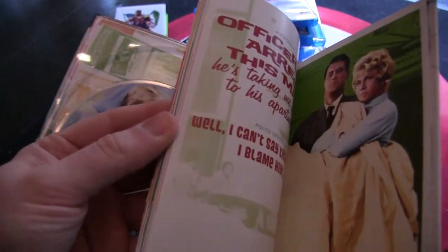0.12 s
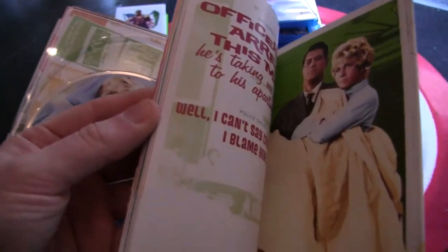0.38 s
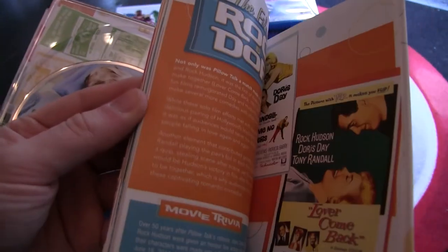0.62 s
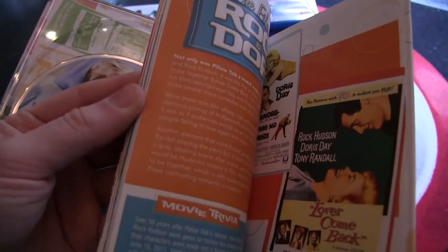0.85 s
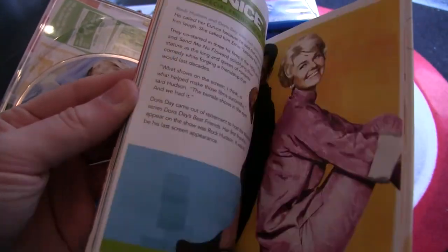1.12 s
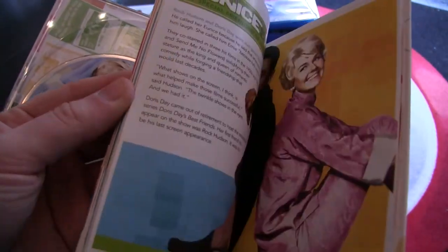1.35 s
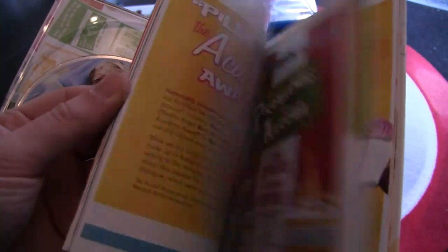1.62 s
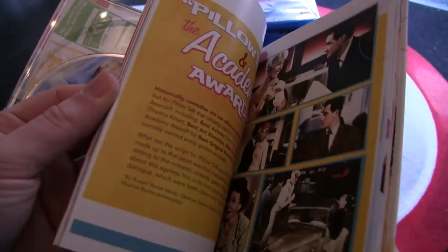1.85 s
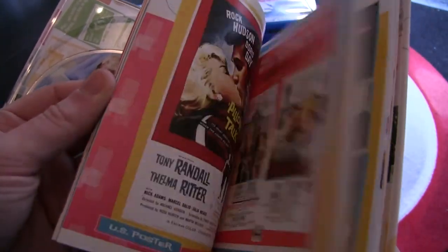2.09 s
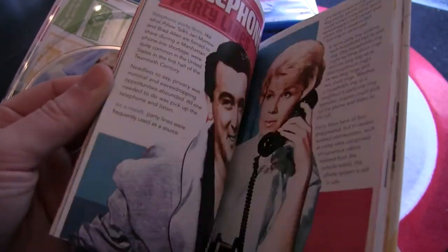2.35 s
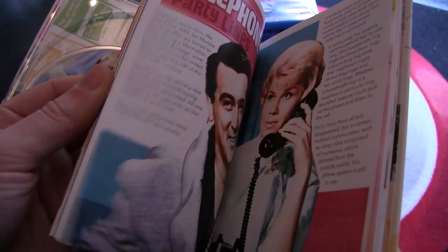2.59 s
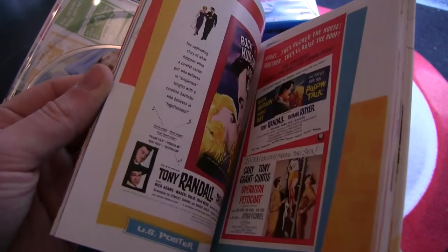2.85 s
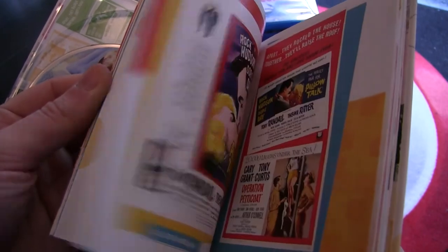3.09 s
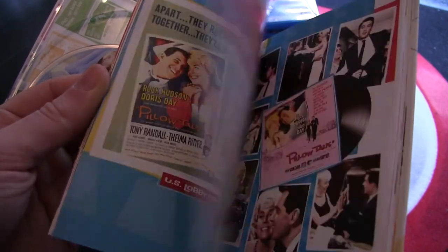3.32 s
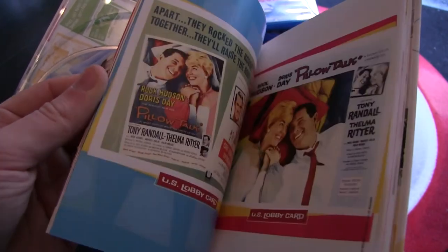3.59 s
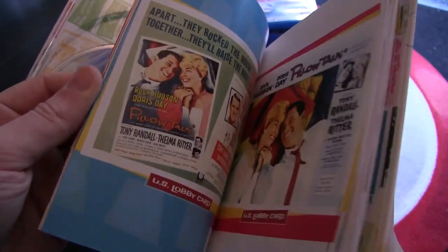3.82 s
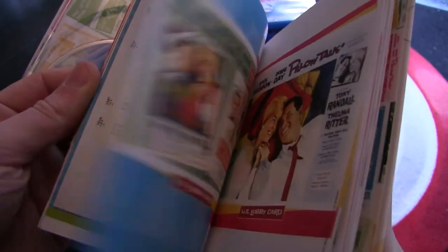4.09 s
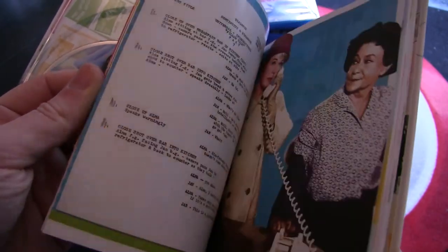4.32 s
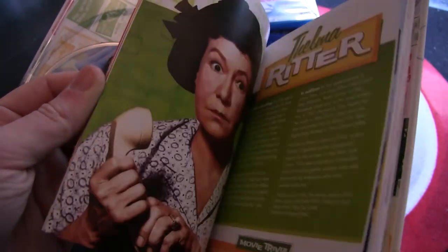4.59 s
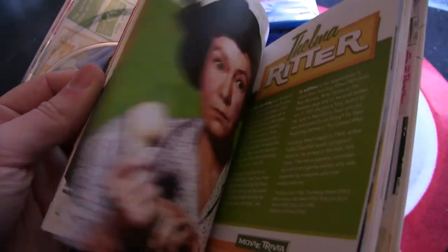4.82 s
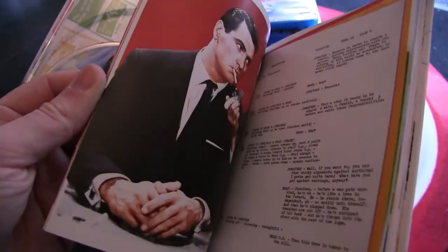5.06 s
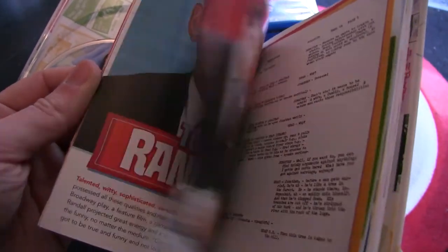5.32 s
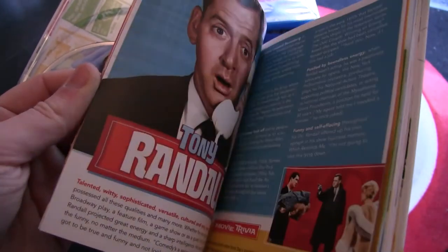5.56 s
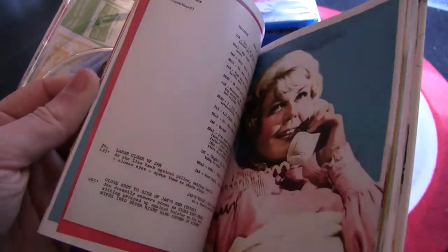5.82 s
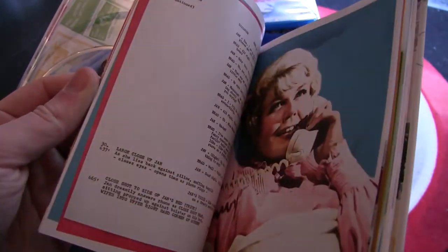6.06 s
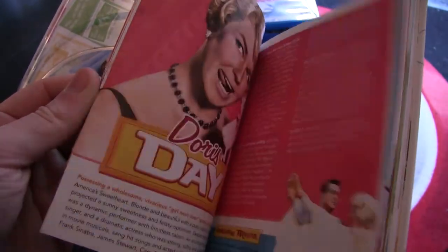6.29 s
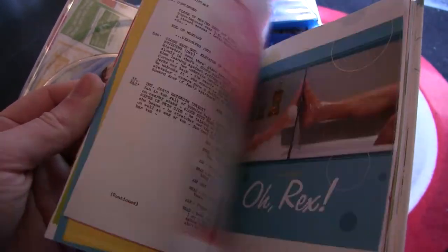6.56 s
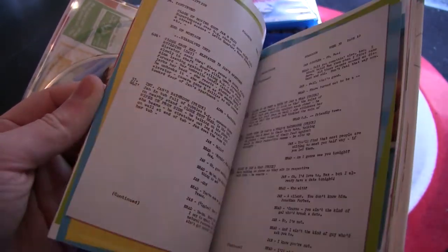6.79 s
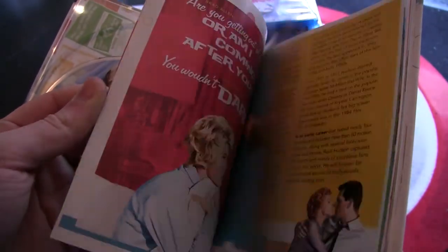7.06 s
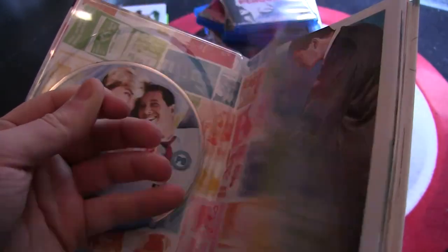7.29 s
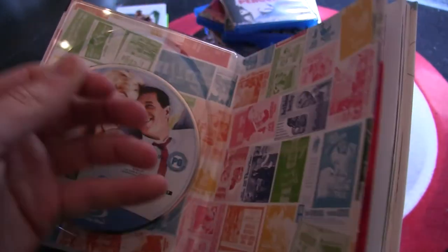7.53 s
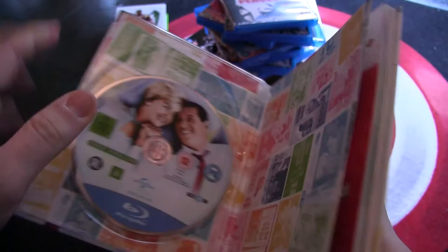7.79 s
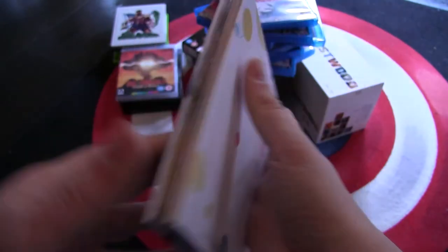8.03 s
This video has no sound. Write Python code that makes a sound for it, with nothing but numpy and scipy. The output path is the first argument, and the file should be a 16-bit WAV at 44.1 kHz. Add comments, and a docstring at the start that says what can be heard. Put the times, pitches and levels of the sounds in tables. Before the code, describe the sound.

Glossy booklet pages flick past one by one in a quiet room, then a stiff cover snaps loudly and a hand slides over it.

```python
"""Glossy pages slip one by one from under a thumb in a quiet room: each release is a clump of tiny slips, heard as
a short snap and a knock of the stack through resonances, with a sinking puff of air. Swinging paper rustles as
swelling grain noise. The stiff cover creaks and later snaps loudly through its modes, then a hand slides over it as
friction noise and the book is pressed shut with a deep puff. A short echo and a diffuse tail answer from the room;
a close stereo microphone adds its own steady, coloured hiss."""
import sys
import numpy as np
from scipy import signal
from scipy.fft import rfft, irfft, next_fast_len
from scipy.io import wavfile

SR = 44100
rng = np.random.default_rng(int(sys.argv[2]) if len(sys.argv) > 2 else 0)


def boost(x):
    """Linear amplitude factor 10**(x/20) for a level x in decibels (scalar or array-like)."""
    u = np.asarray(x, float) / 20
    return 10 ** u


def pcm_store(signal):
    """Save signal as 16-bit PCM."""
    levels = np.round(np.clip(np.atleast_2d(signal), -1, 1) * 32767)
    wavfile.write(sys.argv[1], SR, levels.astype(np.int16).T)


N = 359679
BURST_SIZE = SR // 20   # samples in 50 ms


def rms_one(x):
    """Normalisation by mean power: scale to rms 1."""
    return x / np.sqrt(np.mean(x ** 2) + 1e-20)


def in_time(rows):
    """Linear interpolation: the columns of a time curve at every sample."""
    s, *columns = np.transpose(rows)
    return [np.interp(np.arange(N) / SR, s, column) for column in columns]


def at_hz(points, hz):
    """Spectral interpolation: read levels on a log-frequency axis."""
    point_hz, point_db = np.transpose(points)
    return np.interp(np.log(hz + 1), np.log(point_hz), point_db)


def band(x, low_hz, high_hz):
    """Band limitation by a Butterworth band-pass."""
    return signal.sosfilt(signal.butter(2, [low_hz, high_hz], "band", fs=SR, output="sos"), x)


def resonance(x, hz, width_hz):
    """Damped oscillator: a two-pole resonance with gain 1 on top."""
    r = np.exp(-np.pi * width_hz / SR)
    zeros = [(1 - r * r) / 2, 0, (r * r - 1) / 2]
    poles = [1, -2 * r * np.cos(2 * np.pi * hz / SR), r * r]
    return signal.lfilter(zeros, poles, x)


def grains(size, per_s, uneven_db):
    """Shot noise: random clicks of uneven size and sign."""
    draw = rng.random((3, size))
    present = draw[0] < per_s / SR
    height = boost(-uneven_db * np.log(draw[1] + 0.04))
    return present * height * np.sign(draw[2] - .5) + 1e-9


def burst(rise_ms, fall_ms, lag_ms=0.):
    """Transient envelope of 50 ms: exponential growth to a top at 10 ms plus the lag, then exponential decay."""
    ms = np.arange(BURST_SIZE) * 1000 / SR - 10 - lag_ms
    fade_in = np.clip((ms + 10) / 4.0, 0, 1)
    return np.exp(np.where(ms < 0, ms / rise_ms, -ms / fall_ms)) * fade_in


def add(out, sound, s, db):
    """Superposition: lay in a burst with its 10 ms mark at s, its energy equal to that of 10 ms at db."""
    at = round((s - .01) * SR)
    sound = sound * boost(db) * np.sqrt(SR / 100 / np.sum(sound ** 2))
    out[at:at + len(sound)] += sound[:N - at]


def hiss():
    """Stationary noise of room air and microphone: spectrally shaped, the side part coloured on its own."""
    # mid spectrum shape: (frequency [Hz], relative density [dB per Hz])
    spectrum = [(18, -46), (30, -19.5), (86, -3.5), (233, -1), (404, -2.5), (569, 0.5), (632, -2.5),
                (866, -4), (1540, -6.5), (1670, -5), (8520, -15), (14400, -22), (16000, -34)]
    # stereo width of the noise: (frequency [Hz], side minus mid [dB])
    side_balance = [(60, -5), (110, -5), (200, 2), (380, 3.5), (700, 2.5), (1290, -1), (2380, -5.5),
                    (4400, -6.5), (8120, -7), (15000, -3)]
    mid_db = -60.5   # rms
    size = next_fast_len(N)
    hz = np.arange(size // 2 + 1) * SR / size
    mid, side = irfft(rfft(rng.standard_normal((2, size))) * boost(at_hz(spectrum, hz)), size)
    side = irfft(rfft(side) * boost(at_hz(side_balance, hz)), size)
    left_right = (mid + side * [[1], [-1]])[:, :N]
    return boost(mid_db) / np.std(mid) * left_right


def cover_clicks():
    """Modal excitation: the cover's resonances swell and die together, roughened by slips, around a broad crack.
    Returns what reaches the microphone and what spreads to the walls, where the crack outweighs the ring."""
    # creaks and snap of the cover: (time [s], rms level over 10 ms [dB], build-up [ms], dying [ms],
    # brightness [dB per octave], roughness [0-1])
    clicks = [(0.267, -39, 1.8, 3.6, 3.5, 0.98), (7.3040, -34, 7, 7.7, -3, 1),
              (7.312, -18.5, 1.2, 2.2, 3.5, 0)]
    # modes of the cover: (frequency [Hz], width [Hz], relative level per Hz of width, before brightness [dB])
    cover_modes = [(467, 600, -11), (928, 65, 2), (1206, 620, -0.5), (1900, 94, -6.5), (2200, 540, -2),
                   (2520, 86, -4.5), (3110, 380, -11.5), (3700, 630, -33), (4570, 240, -18),
                   (6800, 590, -33), (10450, 2000, -41)]
    crack_to_ring_db = -8.5   # at the microphone
    ring_to_room_db, crack_to_room_db = -4, -2.5   # relative to the click's level
    near, far = np.zeros(N), np.zeros(N)
    time = np.arange(BURST_SIZE) / SR
    for s, db, rise_ms, fall_ms, bright_db, rough in clicks:
        shape, ring = burst(rise_ms, fall_ms), 0
        for hz, width_hz, mode_db in cover_modes:
            swing = np.sin(2 * np.pi * (hz * time + rng.random()))
            slips = resonance(grains(BURST_SIZE, per_s=10000, uneven_db=0.0), hz, 1300)
            push = (1 - rough) * swing + rough * slips
            mode = resonance(push * shape, hz, width_hz)
            tilted_db = mode_db + bright_db * np.log2(hz / 1500)
            ring = ring + rms_one(mode) * np.sqrt(width_hz) * boost(tilted_db)
        crack = resonance(rng.standard_normal(BURST_SIZE) * shape, hz=2900, width_hz=1640)
        crack = band(crack, 290, 11700)
        add(near, rms_one(ring) + boost(crack_to_ring_db) * rms_one(crack), s, db)
        add(far, ring, s, db + ring_to_room_db)
        add(far, crack, s, db + crack_to_room_db)
    return near, far


def room(x):
    """Reverberation by convolution: a smeared, thin echo from a near surface and a diffuse, partly shared tail."""
    t60_s, echo_ms = .34, 11.6
    tail_db, echo_db = -11.5, -25   # energy of the response, before the final band-pass
    s = np.arange(round(t60_s * SR)) / SR
    noise = rng.standard_normal((3, len(s)))
    noise = noise[:2] + 1.07 * noise[2]   # one noise per channel plus one common to both
    tail = noise * boost(-60 * s / t60_s) * np.clip(s / 0.0018, 0, 1)
    echo = noise * np.exp(-((1000 * s - echo_ms) / 0.84) ** 2)
    answer = boost(tail_db) * rms_one(tail) + boost(echo_db) * rms_one(band(echo, 1600, 15000))
    answer = band(answer, 66, 16000) / np.sqrt(len(s))
    return signal.fftconvolve(answer, x[None], axes=1)[:, :N]


def rustle():
    """Granular friction of moving paper: low pats and a fine bright swish swell and fade with each swing."""
    # a page swings over and brushes its neighbour: (middle [s], half length to 1/e [s],
    # top level of low rustle [dB], top level of high rustle [dB])
    page_swings = [(0.302, 0.027, -65, -60.5), (0.603, 0.11, -70, -74), (1.127, 0.21, -62.5, -67.5),
                   (1.408, 0.037, -70, -60), (1.592, 0.1, -67, -59.5), (2.254, 0.09, -67, -75),
                   (3.31, 0.057, -69, -70), (4.1, .1, -68, -72), (6.2, .08, -71, -84),
                   (6.564, 0.083, -67, -67.5), (6.902, 0.052, -65, -67), (7.024, 0.03, -65, -60),
                   (7.264, 0.028, -57, -56), (7.35, 0.044, -55, -59), (7.423, 0.07, -76, -59.5),
                   (8.048, 0.0066, -41, -54)]
    pats = rms_one(band(grains(N, per_s=700, uneven_db=4.5), 79, 820))
    swish = rms_one(band(grains(N, per_s=4500, uneven_db=6.5), 820, 6800))
    out = np.zeros(N)
    for s, half_s, low_db, high_db in page_swings:
        swell = np.exp(-((np.arange(N) / SR - s) / half_s) ** 2)
        out += swell * (boost(low_db) * pats + boost(high_db) * swish)
    return out


def air_puff(first_hz, last_hz, rise_ms, fall_ms, lag_ms=0.):
    """Volume flow of air squeezed from between two sheets: a soft cycle or two that sinks in pitch."""
    ms = np.arange(BURST_SIZE) * 1000 / SR - 10 - lag_ms
    hz = last_hz + (first_hz - last_hz) * np.exp(-np.maximum(ms + rise_ms, 0) / (0.34 * fall_ms))
    shape = np.exp(-np.where(ms < 0, ms / rise_ms, ms / fall_ms) ** 2)
    return band(shape * np.sin(2 * np.pi * np.cumsum(hz) / SR), 33, 1200)


def let_go(puff_db, knock_db, snap_db, snap_hz, tick_db, rise_ms, fall_ms):
    """Stick-slip release of a page edge: a clump of tiny slips, treble first, then the stack's knock, the air last."""
    out, s = np.zeros(BURST_SIZE), .01
    slips = grains(BURST_SIZE, per_s=14000, uneven_db=2.5)
    puff_detune, knock_detune = np.exp(rng.normal(0, 1, 2) * [.2, .08])   # every page bends a little differently
    clump = slips * burst(rise_ms, fall_ms)
    tick = resonance(clump, hz=7840, width_hz=2460)
    add(out, band(tick, 6600, 16200), s, tick_db)
    snap = resonance(clump, snap_hz, 0.58 * snap_hz) + .2 * clump
    add(out, band(snap, 1650, 7500), s, snap_db)
    push = slips * burst(0.76 * rise_ms, 0.98 * fall_ms, lag_ms=0.17)
    knock = resonance(push, 1030 * knock_detune, width_hz=340) + 0.06 * push
    add(out, band(knock, 450, 1800), s, knock_db)
    hz = 261 * puff_detune
    puff = air_puff(1.683 * hz, 0.87 * hz, rise_ms=0.74 * 3.46, fall_ms=3.46, lag_ms=1.97)
    add(out, puff, s, puff_db)
    return out


def flicks():
    """Impulsive release: sharp flicks push air in step with their knock; soft pats build up slowly, short of treble."""
    # page flicks, levels as rms over 10 ms: (time [s], stack knock [dB], paper snap [dB], snap pitch [Hz],
    # edge tick [dB])
    page_flicks = [(0.513, -45.5, -40, 7000, -46), (0.5793, -54, -60, 3800, -64),
                   (0.7106, -54, -54, 4100, -66), (0.9986, -57, -61, 4500, -68),
                   (1.0027, -46, -42.5, 4960, -45.5), (1.0678, -54, -47.5, 4800, -71),
                   (1.0693, -48, -72, 7200, -52), (1.139, -61, -58.5, 3570, -71),
                   (1.148, -61, -58, 3600, -79), (1.2603, -60.5, -59, 2320, -69),
                   (1.3873, -49, -48, 1900, -63), (1.5789, -50.5, -44, 3300, -48),
                   (1.6305, -52, -48.5, 5160, -53), (2.0395, -49.5, -40.5, 4000, -47),
                   (2.2179, -53.5, -60, 3400, -55), (2.2245, -49, -40.5, 4140, -49.5),
                   (2.633, -50, -41.5, 3700, -49), (3.1348, -48.5, -50, 5000, -54),
                   (3.3338, -48.5, -43.5, 6330, -49.5), (3.623, -56.5, -59.5, 2480, -75),
                   (3.845, -43.5, -49.5, 2080, -72), (4.1109, -53.5, -52.5, 3180, -60),
                   (4.399, -51.5, -51, 4800, -58), (4.5713, -64, -54.5, 2900, -53.5),
                   (4.656, -74, -63, 3080, -61.5), (4.8465, -52, -49, 3300, -59),
                   (5.311, -59, -64, 4000, -73), (5.3189, -54, -48.5, 3960, -58.5),
                   (5.646, -59, -61, 3400, -75), (5.6589, -51.5, -49.5, 4940, -64),
                   (5.903, -65, -61.5, 2700, -77), (6.1742, -58, -61, 4200, -73),
                   (6.183, -49.5, -54, 6100, -57), (6.371, -63, -59, 6850, -69),
                   (6.3848, -47, -48.5, 6500, -56), (6.5167, -62, -50.5, 3800, -52.5),
                   (6.5224, -73, -56, 3000, -56), (6.5569, -48.5, -47, 1890, -56),
                   (6.7546, -48.5, -64, 2000, -79), (6.898, -47, -45.5, 5330, -53),
                   (6.9426, -51, -59, 2000, -75), (7.0188, -54, -55, 5800, -65),
                   (7.0253, -47, -46.5, 5700, -63), (7.0774, -59.5, -45.5, 3400, -58),
                   (7.2586, -55, -48, 6100, -64), (7.2627, -49.5, -45.5, 2370, -54)]
    # dull pats of pages and fingers on the stack, levels as rms over 10 ms: (time [s], air puff [dB],
    # stack knock [dB], paper snap [dB])
    soft_pats = [(0.4105, -79, -57, -63.5), (0.634, -54.5, -60, -71), (1.1205, -54, -64, -74),
                 (1.5224, -61, -61, -72), (1.707, -57, -75, -73), (1.9126, -59, -69, -74),
                 (3.2789, -60, -53.5, -75), (6.336, -62, -63, -74), (6.3673, -61, -54.5, -68),
                 (6.702, -58.5, -56, -75), (6.8757, -70, -57, -63), (6.8883, -73, -53.5, -67),
                 (7.1283, -61, -55, -76), (7.148, -57.5, -67, -76), (7.727, -69, -56, -57),
                 (7.8032, -61, -54, -56.5), (7.863, -53.5, -48.5, -66), (7.9771, -50, -50, -63),
                 (7.9981, -64, -42.5, -50), (8.021, -68, -52, -50), (8.035, -66, -54, -62)]
    out = np.zeros(N)

    def place(s, *release):
        at = round((s - .01) * SR)
        out[at:at + BURST_SIZE] += let_go(*release)

    for s, knock_db, snap_db, hz, tick_db in page_flicks:
        # a thicker bunch knocks more than it snaps and lets go more slowly
        cling = np.exp(.06 * np.clip(knock_db - snap_db, -16, 3))
        place(s, knock_db - 5.5, knock_db, snap_db, hz, tick_db, 1.35 * cling, 2 * cling)   # last two in ms
    for s, puff_db, knock_db, snap_db in soft_pats:
        place(s, puff_db, knock_db, snap_db, 4000, snap_db - 16, 2, 3.4)   # snap Hz, tick dB, rise and fall ms
    return out


def thumps():
    """Volume displacement: stiff covers move more air than a page, in longer, deeper puffs."""
    # cover falling to and book shutting: (time [s], rms level over 10 ms [dB], first pitch [Hz], last pitch [Hz],
    # build-up [ms], dying [ms])
    cover_puffs = [(7.3163, -41, 334, 95, 1.5, 9.9), (8.0477, -38.5, 388, 107, 3.7, 9.8)]
    out = np.zeros(N)
    for s, db, first_hz, last_hz, rise_ms, fall_ms in cover_puffs:
        add(out, air_puff(first_hz, last_hz, rise_ms, fall_ms), s, db)
    return out


def slide():
    """Sliding friction of skin on gloss: fine noise with a moving resonance, higher for a quicker hand."""
    # hand on the cover: (time [s], dull part [dB], bright part [dB], resonance centre [Hz])
    hand_course = [(7.55, -79, -84, 2150), (7.70, -61, -60, 2600), (7.78, -57, -67, 2300),
                   (7.858, -50.5, -66, 1940), (7.98, -51, -60.5, 2400), (8.032, -53, -57, 2200),
                   (8.06, -40, -46.5, 2930), (8.1, -51, -42, 4870), (8.156, -54.5, -49.5, 4630)]
    dull_db, bright_db, centre_hz = in_time(hand_course)
    start = round(hand_course[0][0] * SR)
    knots = np.arange(0, N, 300)
    grip = np.interp(np.arange(N), knots, boost(rng.normal(0, 1.4, len(knots))))   # uneven drag
    rub = grip * (rng.standard_normal((2, N)) + .6 * grains(N, per_s=1500, uneven_db=4.0))
    # a bank of fixed resonances, weighted by closeness to the moving centre
    peak = np.zeros(N)
    for hz in np.geomspace(1500, 7000, num=8):
        closeness = np.exp(-(np.log(hz / centre_hz) / 0.19) ** 2)
        peak += resonance(rub[1], hz, 0.21 * hz) / np.sqrt(hz) * closeness
    bright = rms_one(band(rub[1], 3300, 12000)) + 0.52 * rms_one(band(peak, 2900, 11700))
    dull = rms_one(band(rub[0], 450, 4200)) + .5 * rms_one(band(peak, 710, 2800))
    friction = boost(dull_db) * rms_one(dull) + boost(bright_db) * rms_one(bright)
    return friction * (np.arange(N) > start)


def scene():
    """Interaural level difference: the book lies a little to the left, which shows in the treble only."""
    paper = flicks() + thumps() + slide() + rustle()
    near, far = cover_clicks()
    book = paper + near
    treble = signal.sosfilt(signal.butter(1, 1900, "high", fs=SR, output="sos"), book)
    channel_gain = boost(np.array([[2.27], [-2.27]]))   # left, right
    direct = book + treble * (channel_gain - 1)
    return direct + room(paper + far) + hiss()


def roll_off(x):
    """The treble ends steeply here."""
    return signal.sosfilt(signal.butter(12, 16520, fs=SR, output="sos"), x)


def record(dry):
    """Linear superposition is complete: the two-channel mix is passed on at its own level."""
    return roll_off(dry)


dry = scene()
out = record(dry)
pcm_store(out)
```